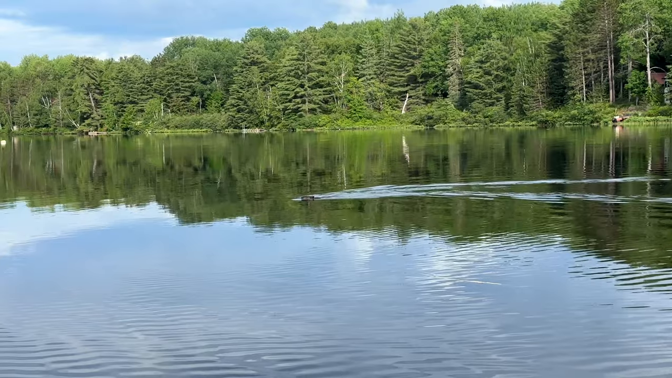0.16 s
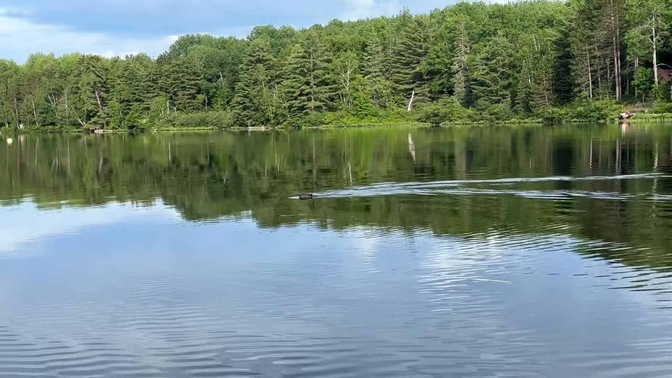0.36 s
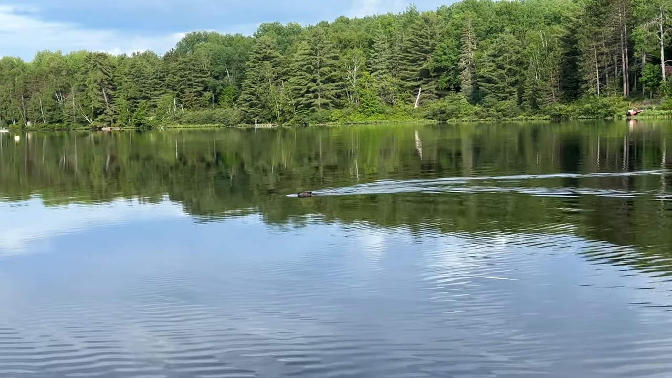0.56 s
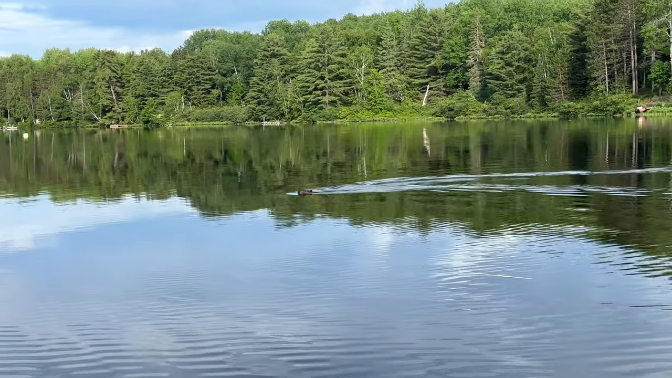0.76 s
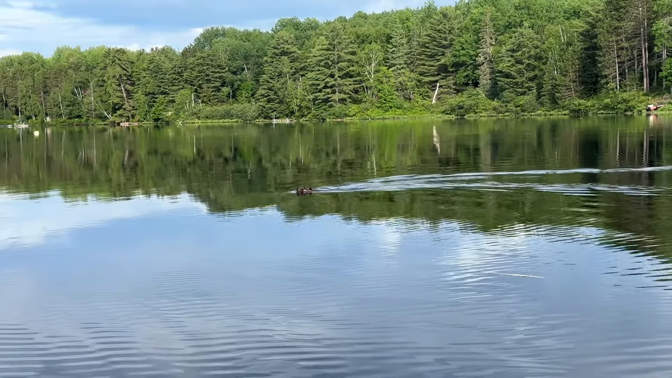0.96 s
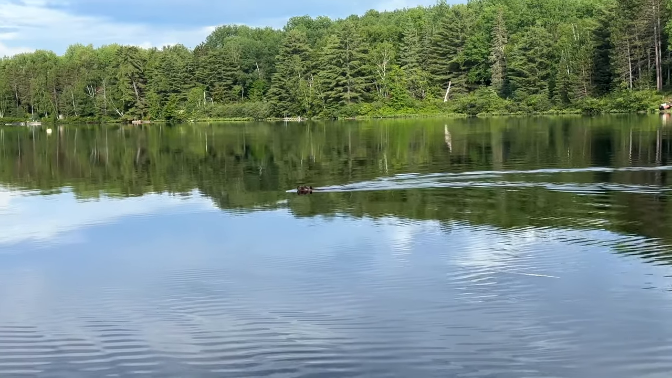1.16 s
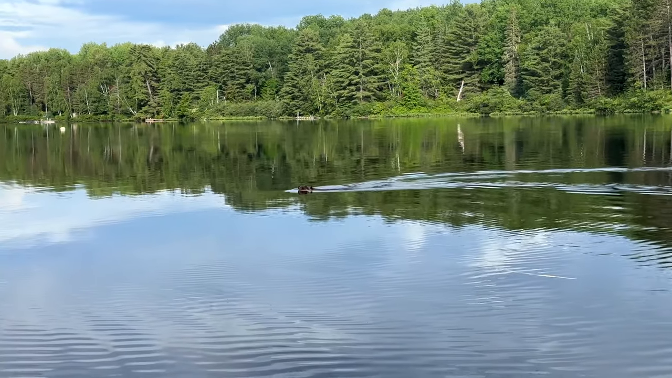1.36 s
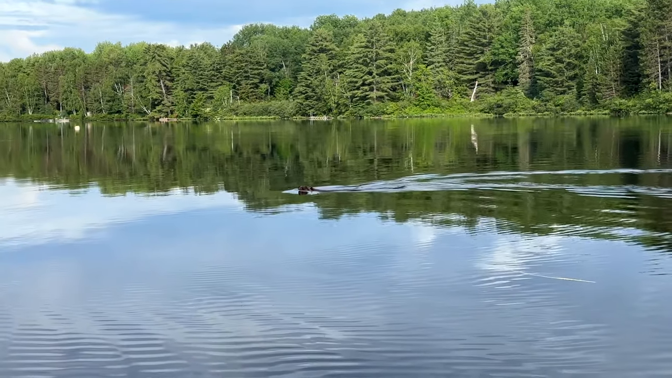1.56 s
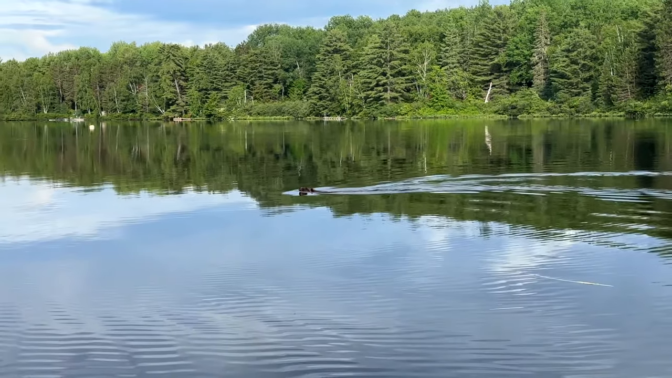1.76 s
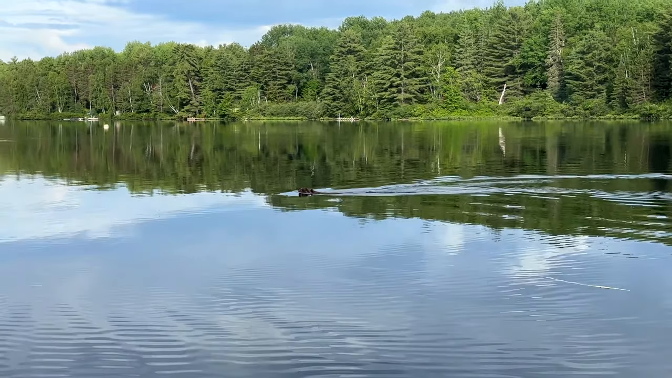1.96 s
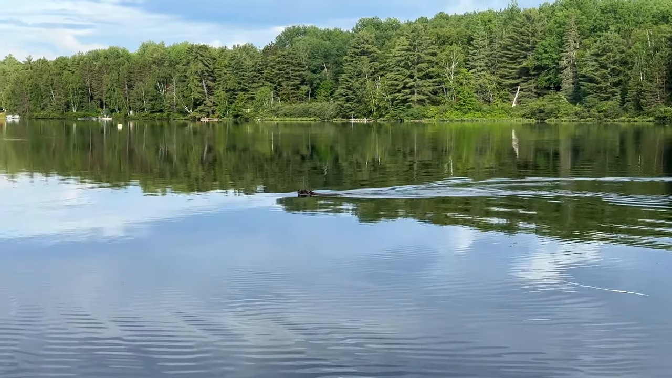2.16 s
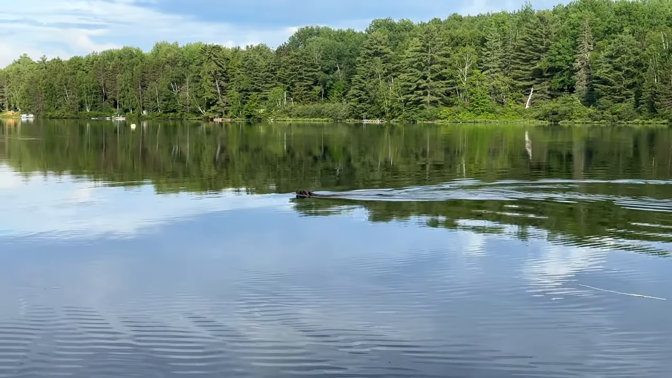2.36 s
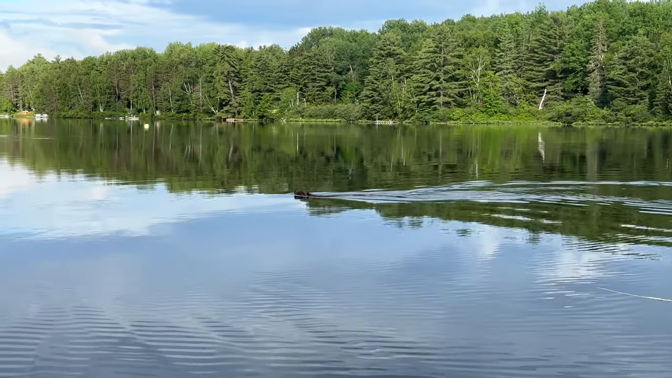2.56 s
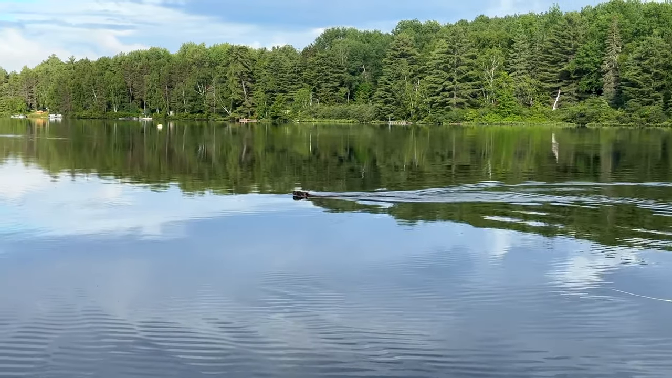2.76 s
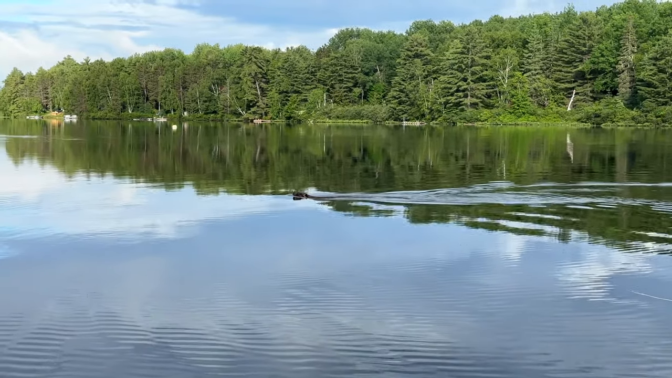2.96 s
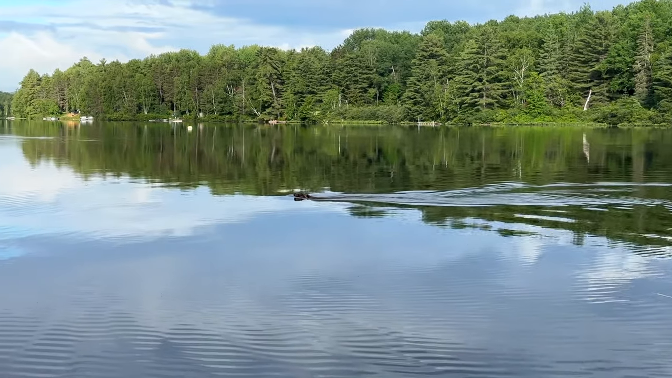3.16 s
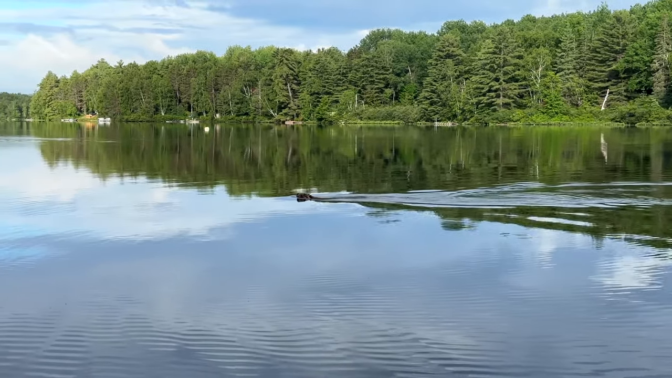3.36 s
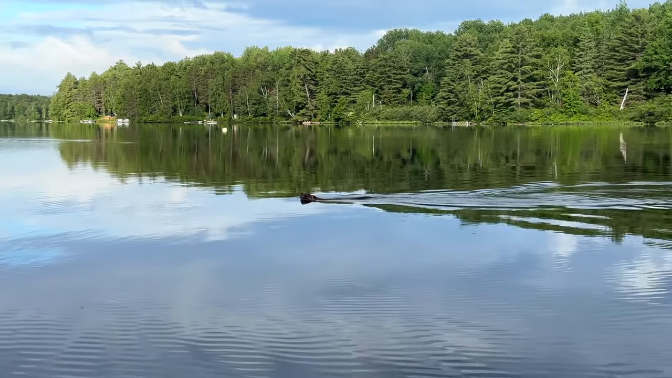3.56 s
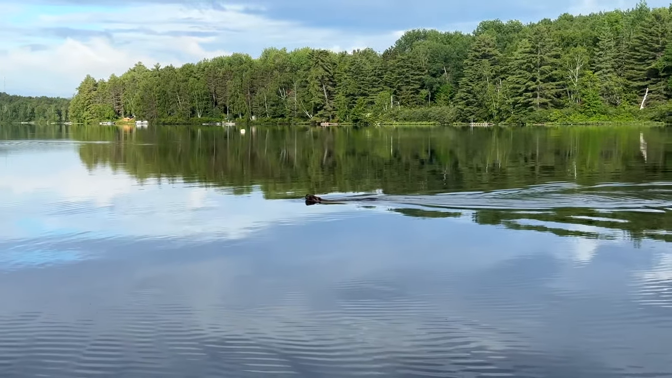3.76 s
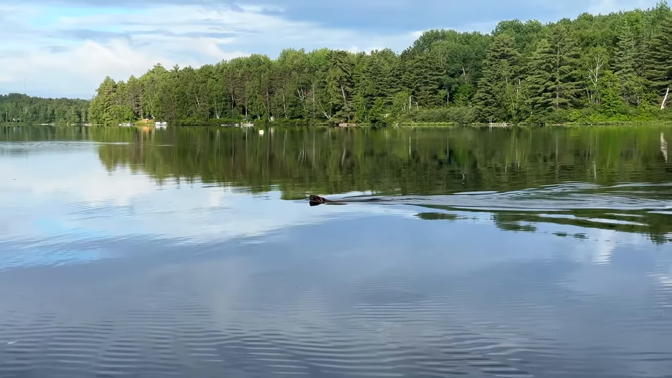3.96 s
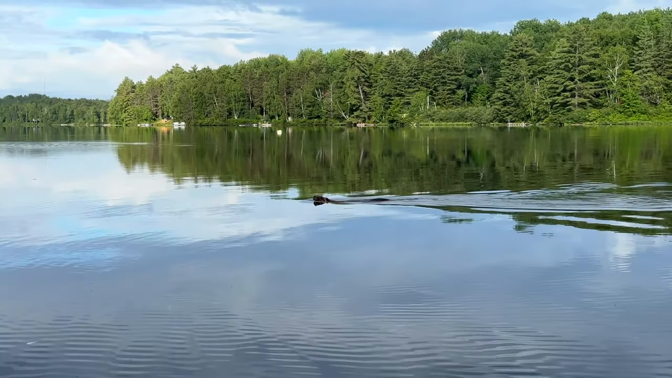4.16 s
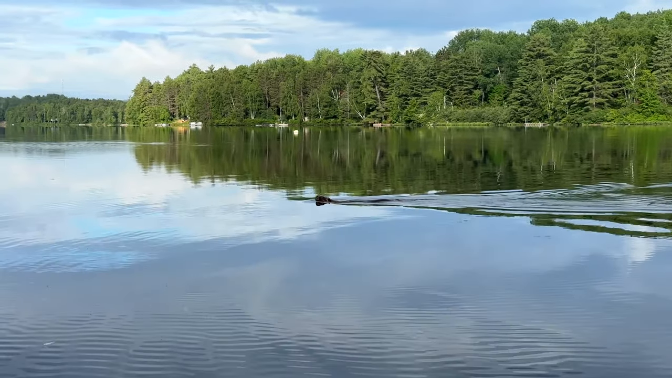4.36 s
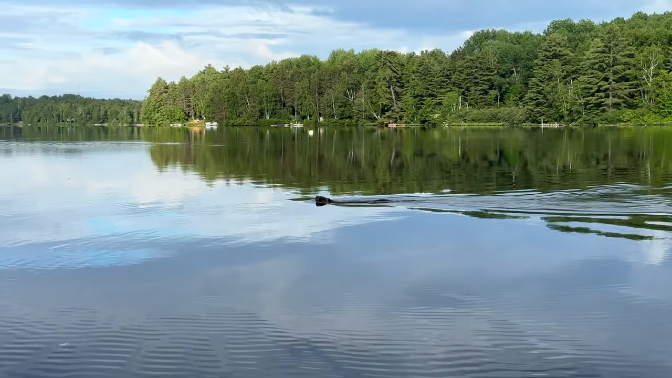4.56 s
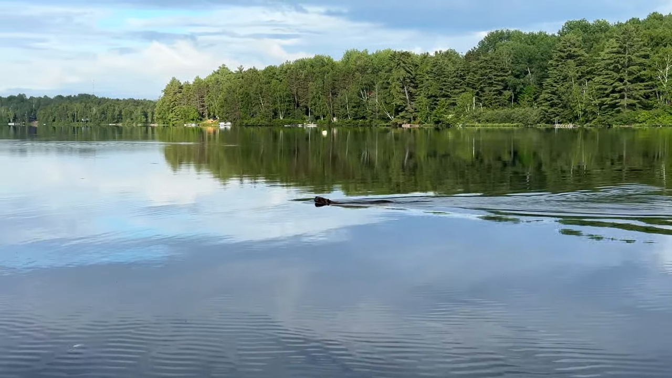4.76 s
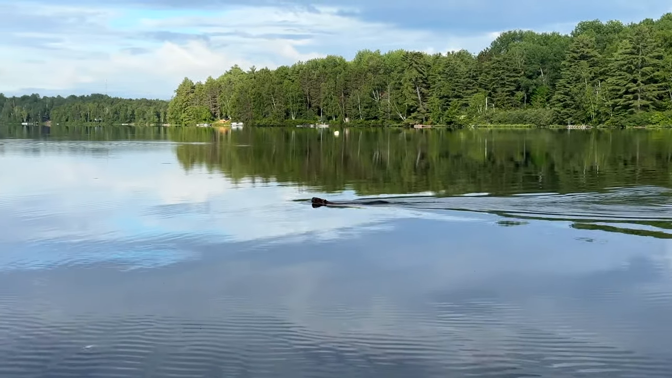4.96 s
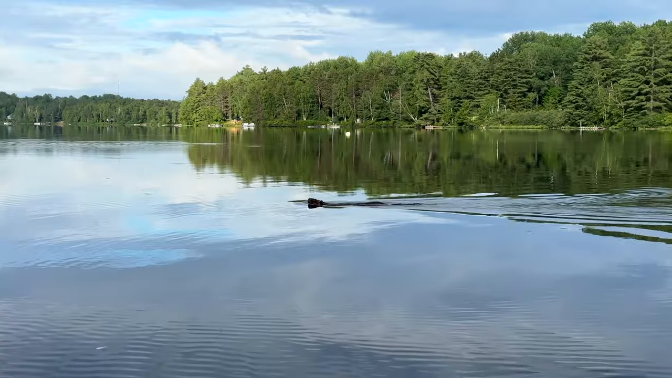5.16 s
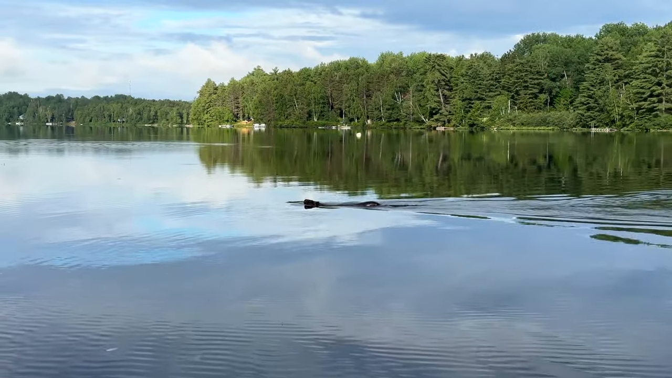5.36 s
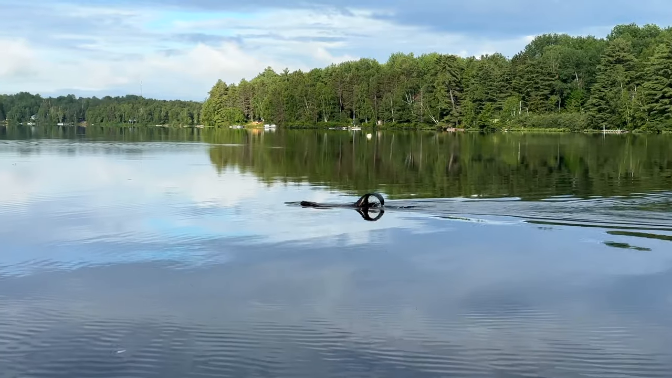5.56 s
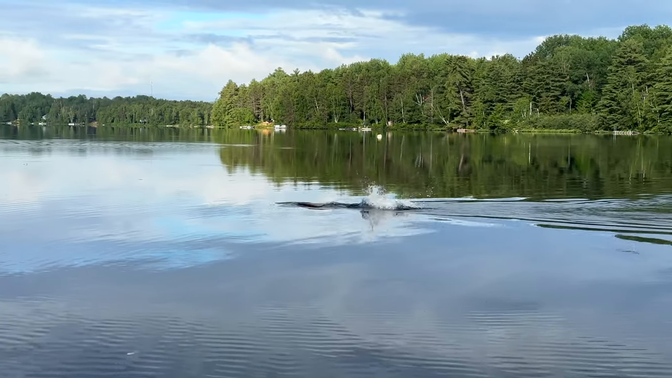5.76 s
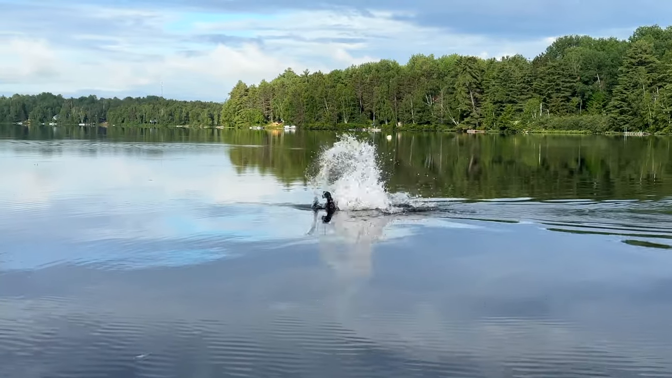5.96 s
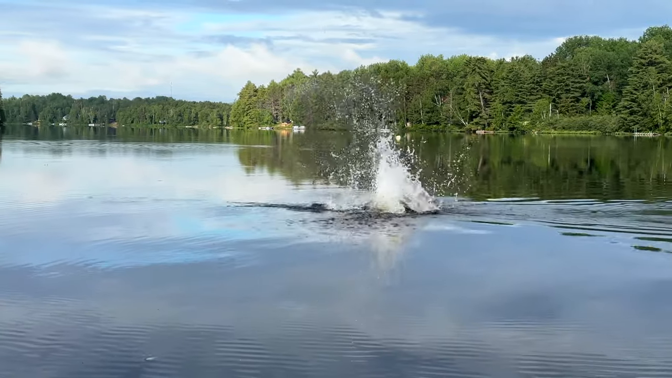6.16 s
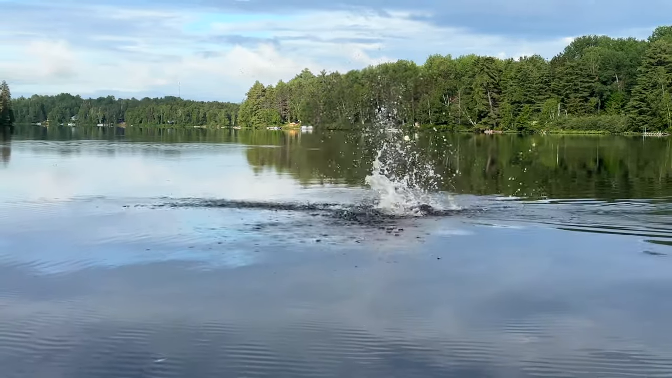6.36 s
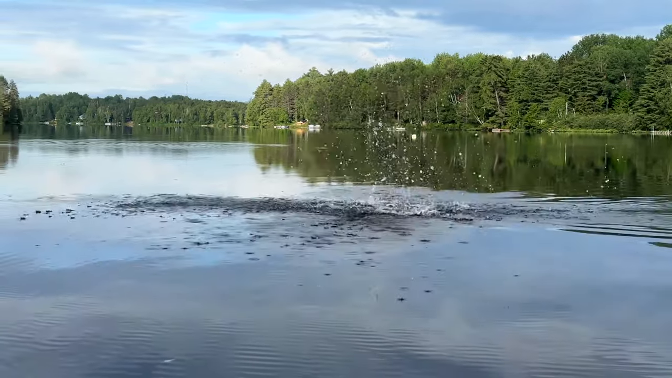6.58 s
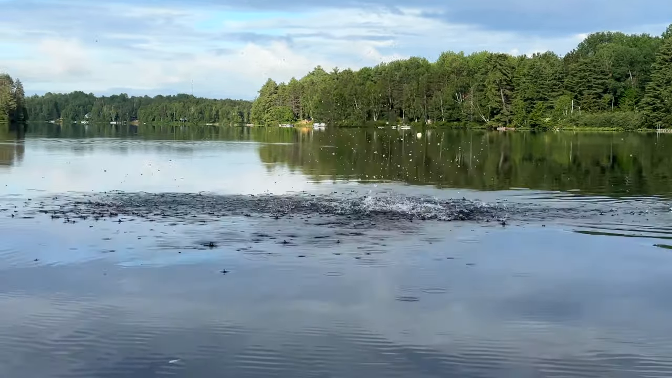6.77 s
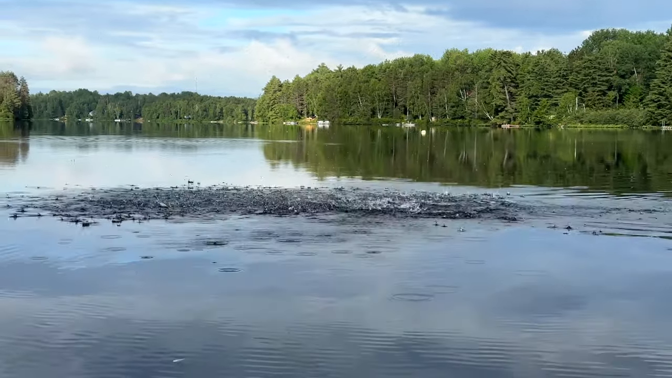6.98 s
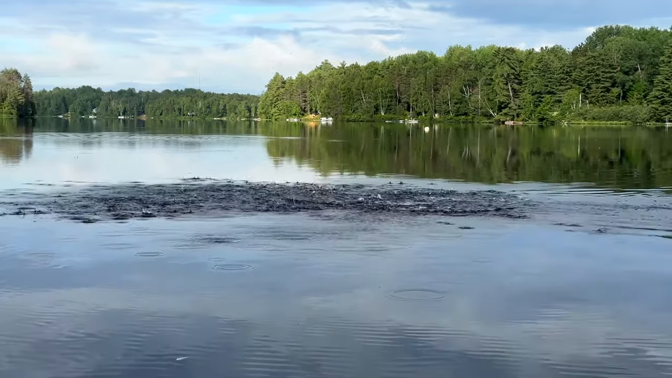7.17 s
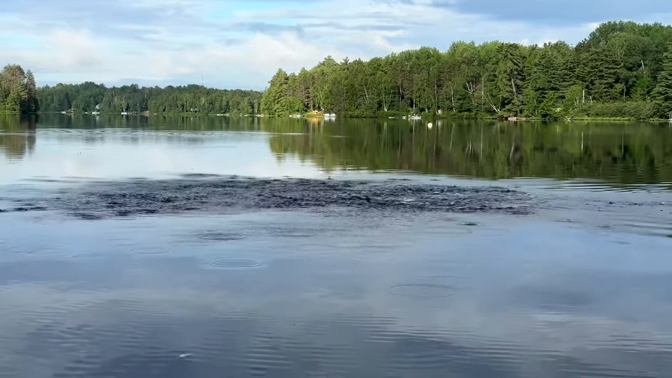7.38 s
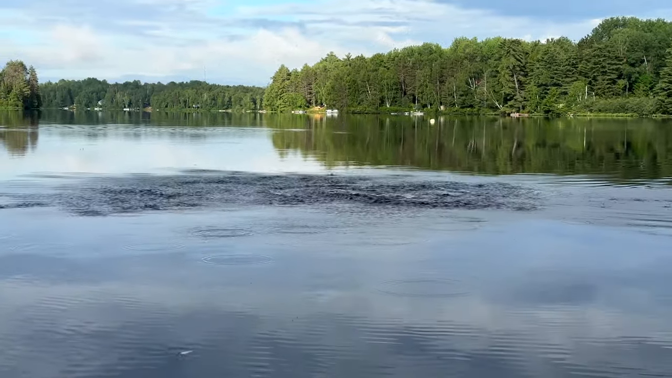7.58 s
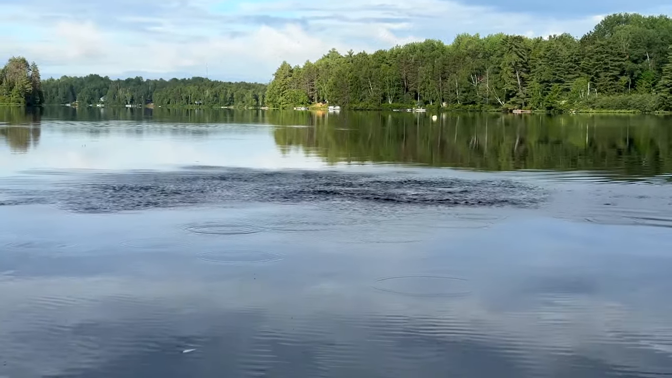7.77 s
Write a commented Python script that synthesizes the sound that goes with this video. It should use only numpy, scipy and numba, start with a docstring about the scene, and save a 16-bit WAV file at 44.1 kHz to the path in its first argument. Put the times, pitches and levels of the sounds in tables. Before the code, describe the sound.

Five quiet seconds of small thin bird whistles, even pips and buzzy trills from a wooded shore over a faint breeze. Brief bubbling as a beaver arches, then one very loud, dry-edged smack of its tail on the lake, a bassy gulp a quarter second later, and a dense splash. Water patters down for about a second and fades; a few faint bird calls remain. Open-air phone pickup with a light echo from the trees.

```python
"""Beaver tail slap on a calm lake

A beaver arches and slaps its tail on the water, heard by the two ports of a phone: shaped noise through
resonances makes the wet crack, a sagging low tone the thump of the collapsing cavity, and ringing tones add
to both. Thousands of damped grains make the gurgle, the spray and the rain of drops that thins out; ringing
tones and short noise taps make single bubbles, drips and rustles. Gliding near-sines sing from the wooded
shore over soft air noise."""
import sys
import numpy as np
from scipy import signal
from scipy.fft import rfft, irfft, next_fast_len
from scipy.io import wavfile
from scipy.ndimage import uniform_filter1d
from numba import njit

SR = 44100
rng = np.random.default_rng(int(sys.argv[2]) if len(sys.argv) > 2 else 0)


def gain_from_decibels(decibels):
    """Convert decibel values to linear amplitude factors."""
    exponent = np.asarray(decibels, float) / 20
    return 10 ** exponent


def to_wav(sig):
    """Store sig (one row per channel, or 1-D mono) as 16-bit WAV at the path in sys.argv[1].

    Samples outside -1..1 are clipped; the rate is SR.
    """
    pcm = np.clip(np.atleast_2d(sig), -1, 1) * 32767
    pcm = np.round(pcm).astype(np.int16)
    wavfile.write(sys.argv[1], SR, pcm.T)  # frames by channels


N = 344846
LONG = next_fast_len(N)

# Start and end in seconds of the time the water moves.
WET_S = 5.38, 7.82
# Colour of spray and thrown drops. Each row: frequency in Hz, relative gain in dB.
SPRAY = [(1500, -2), (2200, -11), (3300, -6), (5000, -7), (6500, -11.5), (7600, -5), (10000, -4),
         (12000, -13), (14800, -4.5), (16000, -18)]
# Dense spray as the back arches, the tail lands and water rains down. Each row: time in seconds, level in dB.
SPRAY_LEVEL = [(5.38, -106), (5.41, -83), (5.48, -75), (5.5, -61.5), (5.535, -61.5), (5.56, -51.5),
               (5.6, -46.5), (5.62, -59), (5.69, -69.5), (5.72, -44), (5.75, -67.5), (5.815, -61),
               (5.835, -45.5), (5.9, -41.5), (6.08, -45), (6.85, -46.5), (6.97, -51), (7.15, -64),
               (7.25, -69), (7.82, -84)]


def level(x, db):
    """Set the rms level."""
    return x * gain_from_decibels(db) / np.sqrt(np.mean(x ** 2))


def curve(rows):
    """Draw a (seconds, value) table as a line, sample by sample."""
    s, value = np.transpose(rows)
    return np.interp(np.arange(N) / SR, s, value)


def colour(x, points):
    """Filter through (Hz, dB) points joined on a log axis, 80 dB down outside them."""
    hz, db = np.transpose(points)
    f = np.fft.rfftfreq(LONG, 1 / SR) + 1
    gain = gain_from_decibels(np.interp(np.log(f), np.log(hz), db, -80, -80))
    return irfft(rfft(x, LONG) * gain, LONG)[..., :N]


def band(x, hz, width):
    """One resonance, gain 1 at the centre."""
    return signal.lfilter(*signal.iirpeak(hz, hz / width, SR), x)


def walk(rate):
    """Random levels held 1 / rate seconds and smoothed twice; spread near 1."""
    k = int(SR / rate)
    held = np.repeat(rng.standard_normal(N // k + 1), k)
    return 1.04 * uniform_filter1d(uniform_filter1d(held, k), k)[:N]


def flutter(x, depth_db, rate, db=0):
    """Let the level wander by about depth_db around db."""
    return x * gain_from_decibels(db + depth_db * walk(rate))


def later(x, s):
    """Shift a stereo sound by s seconds; its end wraps to the front."""
    return np.roll(x, int(s * SR), axis=1)


def add(out, s, sound, pan_db=0):
    """Mix a sound in at s seconds; pan_db is left minus right."""
    i = int(s * SR)
    sound = sound[:N - i]
    out[:, i:i + len(sound)] += sound * gain_from_decibels(np.array([[pan_db], [-pan_db]]) / 2)


def whistle(out, rows, start=0, buzz=0):
    """A near sine along (seconds, Hz, dB) rows with soft ends; buzz chops it into an uneven trill."""
    s, hz, db = np.transpose(rows)
    t = np.arange(s[0], s[-1], 1 / SR)
    trill_rate_hz = 110
    beat = 2 * np.pi * trill_rate_hz * t + .015 * np.cumsum(rng.standard_normal(len(t)))
    pitch = uniform_filter1d(np.interp(t, s, hz), size=300) * (1 + buzz * .07 * np.sin(beat))
    # slight random unsteadiness of pitch
    pitch = pitch * (1 + .12 * uniform_filter1d(rng.standard_normal(len(t)), size=350))
    edge = np.minimum(np.minimum(t - s[0], s[-1] - t) / (.005 + .04 * buzz), 1)
    loudness = np.sqrt(2) * gain_from_decibels(np.interp(t, s, db)) * edge * (1 + buzz * np.cos(beat))
    add(out, start + s[0], loudness * np.sin(2 * np.pi * np.cumsum(pitch) / SR))


def shore(x, t60, db):
    """Scattered echoes from the trees around the water: a decaying noise tail, mostly common to both sides."""
    t = np.arange(int(t60 * SR)) / SR
    tail = rng.standard_normal((2, len(t))) * 1000. ** (-t / t60) * np.minimum(t / 0.013, 1)
    tail = tail[0] + 0.12 * tail
    return signal.fftconvolve(x, tail * gain_from_decibels(db) / np.sqrt(np.sum(tail[0] ** 2)), axes=1)[:, :N]


def crack(out):
    """Water bursts from under the flat tail for about ten milliseconds: noise rings in a set of resonances."""
    # What the crack rings in. Each row: centre in Hz, width in Hz, relative level in dB.
    resonances = [(375, 570, -8), (880, 670, 2.5), (1560, 90, -3.5), (3200, 630, -5), (5286, 180, -8.5),
                  (7800, 1300, -12), (10000, 2300, -10.5), (14700, 2500, -22.5)]
    start_s, rise_s, hold_s, fall_s, crack_db = 5.699, .004, .0065, .0017, -16.5
    t = np.arange(SR // 20) / SR
    push = np.minimum(t / rise_s, 1) ** 2 * np.exp(-np.maximum(t - rise_s - hold_s, 0) / fall_s)
    burst = push * rng.standard_normal(len(t))
    ringing = sum(gain_from_decibels(db) * band(burst, hz, width) / np.sqrt(width) for hz, width, db in resonances)
    add(out, start_s, ringing * gain_from_decibels(crack_db) / ringing[:SR // 80].std())


def thump(out):
    """The cavity left by the tail closes a quarter second later: a brief low tone of sagging pitch."""
    centre_s, spread_s, thump_db, centre_hz = 5.950, 0.0051, -12, 137
    sag = 0.17  # share of the pitch lost per spread_s
    t = np.arange(SR // 20) / SR
    u = (t - t.mean()) / spread_s
    # the pitch sags as the trapped air pocket sinks and widens
    phase = 2 * np.pi * centre_hz * spread_s * (u - sag * u ** 2 / 2)
    add(out, centre_s - t.mean(), gain_from_decibels(thump_db) * np.exp(-np.abs(u) ** 3 / 2) * np.cos(phase))


def slap():
    """The tail hits the water: noise burst of the crack, then low tone of the thump."""
    out = np.zeros((2, N))
    crack(out)
    thump(out)
    return out


@njit
def grains(start, hz, cycles, size, glide, length):
    """Each grain is a small bubble: a damped tone that rises as it dies."""
    out = np.zeros(length)
    for k in range(len(start)):
        ring = int(cycles[k] * SR / hz[k]) + 2
        p = np.exp(2j * np.pi * hz[k] / SR - 6 / ring)
        turn = np.exp(2j * np.pi * hz[k] / SR * glide / ring)
        z = size[k] + 0j
        for i in range(start[k], min(start[k] + ring, length)):
            out[i] += z.imag
            z, p = z * p, p * turn
    return out


def shower(count, lo_hz, hi_hz, cycles, scatter_db, glide, shrink=0):
    """Grains strewn over the splash; a few are much larger, and with shrink the biggest bubbles stop first."""
    when, pitch, ring, chance = rng.random((count, 4)).T
    start = ((WET_S[0] + when * (WET_S[1] - WET_S[0])) * SR).astype(int)
    lo_hz = lo_hz * (1 + shrink * when ** 3)
    hz = lo_hz * (hi_hz / lo_hz) ** pitch
    size = gain_from_decibels(-scatter_db * np.log(1 - chance))
    return grains(start, hz, cycles * (.5 + ring), size, glide, N)


def spread(x, points, share, db):
    """Play grains at both ports, plus a share of unrelated noise that follows them, while the water moves."""
    moving = slice(int(WET_S[0] * SR), int(WET_S[1] * SR))
    x = x / x[moving].std()
    grain_level = uniform_filter1d(np.abs(x), size=200)
    both = colour(x + share * grain_level * rng.standard_normal((2, N)), points)
    out = np.zeros((2, N))
    out[:, moving] = (both * gain_from_decibels(db))[:, moving] / both[:, moving].std()
    return out


def gurgle():
    """Bubbles in the churned water come before the spray and die before it."""
    # Colour of the gurgle. Each row: frequency in Hz, relative gain in dB.
    gurgle_colour = [(50, -16), (150, -21.5), (400, -6.5), (1000, 3.5), (1600, 7), (1900, -7),
                     (2600, -26.5)]
    # Gurgle against spray. Each row: time in seconds, level over the spray in dB.
    gurgle_lead = [(5.47, 23.5), (5.5, 5.5), (5.95, 9.5), (7.4, -16)]
    bubbles = shower(count=5000, lo_hz=110., hi_hz=1900., cycles=8., scatter_db=2.1, glide=.3, shrink=15)
    gurgle_db = curve(SPRAY_LEVEL) + curve(gurgle_lead) + 1.6 * walk(30)
    return spread(bubbles, gurgle_colour, .25, gurgle_db)


def fizz():
    """Fine spray: grains so dense that they fuse into a wash."""
    spray = shower(count=27000, lo_hz=1200., hi_hz=15500., cycles=9., scatter_db=2.4, glide=.1, shrink=8)
    return spread(spray, SPRAY, .3, curve(SPRAY_LEVEL) + 1.8 * walk(60) + 2.3 * walk(18))


def patter():
    """Larger drops: sparse grains that stand out as the rain thins, then stop."""
    # Drops against spray. Each row: time in seconds, level over the spray in dB.
    drops_lead = [(5.5, 1), (5.56, -3.5), (6.08, -12), (6.85, 1.5), (7.25, 4), (7.33, -14)]
    drops = shower(count=1100, lo_hz=1200., hi_hz=15000., cycles=14., scatter_db=1.8, glide=.15, shrink=7)
    return spread(drops, SPRAY, .3, curve(SPRAY_LEVEL) + curve(drops_lead))


def splash():
    """Churned and thrown water: gurgle, fizz and patter."""
    return gurgle() + fizz() + patter()


def ring(out, s, db, hz, t60, glide, pan_db=0):
    """A ringing tone: a decaying sine whose pitch climbs by the share glide within half of t60."""
    t = np.arange(SR // 2) / SR
    phase = 2 * np.pi * np.cumsum(hz * (1 + glide * np.minimum(2 * t / t60, 1))) / SR
    add(out, s, gain_from_decibels(db) * np.minimum(t / .0018, 1) * 1000. ** (-t / t60) * np.sin(phase), pan_db)


def tap(out, s, db, hz, t60):
    """A single pat or rustle: band noise, set to an rms of db and then made to decay."""
    t = np.arange(SR // 2) / SR
    width = min(80 * t60 * hz, 2 * hz, 9000)  # the briefest taps are the most pitched
    hiss = band(band(rng.standard_normal(len(t)), hz, width), hz, width)
    add(out, s, level(hiss, db) * 1000. ** (-t / t60))


def ringing_tones(out):
    """Tones of the slap and of bubbles in the churned water, the softer ones longer; bloops slide up."""
    # Ringing tones: those at 5.709, 5.939 and 5.949 belong to the slap's crack and thump; the others are
    # bubbles in the churned water. Each row: start in seconds, starting level in dB, starting pitch in Hz.
    tones = [(5.412, -50, 990), (5.446, -48.5, 756), (5.494, -30.5, 1170), (5.507, -45, 322),
             (5.543, -26.5, 322), (5.584, -32.5, 863), (5.594, -27, 1240), (5.709, -5.5, 393),
             (5.785, -36.5, 430), (5.844, -27, 1370), (5.854, -24.5, 804), (5.939, -5.5, 365),
             (5.949, -16, 300), (5.979, -13, 308), (6.058, -24, 620), (6.315, -22, 325), (7.096, -53, 1000),
             (7.116, -50, 1146), (7.198, -54, 913), (7.228, -58, 1396), (7.289, -47, 1304)]
    # Hollow bloops as a pocket closes. Each row: start and length in seconds, first and last pitch in Hz,
    # rms level in dB.
    bloops = [(6.778, .04, 480, 1000, -54), (6.87, .03, 580, 1300, -57), (6.99, .05, 580, 950, -64)]
    for s, db, hz in tones:
        t60 = min(0.013 * gain_from_decibels(-0.31 * db), .055)  # 0.31 dB more ring time per dB less level
        ring(out, s, db, hz, t60, glide=.1)
    for s, length, hz, to_hz, db in bloops:
        whistle(out, [(0, hz, db), (length, to_hz, db)], s)


def falling_water(out):
    """Sheets of water fall back flat and the last big drops land: short noise taps."""
    # Flat sheets. Each row: start in seconds, rms level in dB before the decay.
    pats = [(5.496, -47.5), (5.845, -35.5), (5.896, -32), (5.94, -37.5), (6.047, -37.5), (6.348, -37.5),
            (6.508, -37.5), (6.594, -38), (6.823, -35), (6.847, -38), (6.883, -38)]
    # Last big drops. Each row: start in seconds, rms level in dB before the decay, centre in Hz.
    last_drops = [(6.939, -33, 5000), (6.9454, -26.5, 5300), (6.963, -31, 8160), (7.055, -50, 6000),
                  (7.0615, -35.5, 9300), (7.093, -36, 8000), (7.129, -31, 6240), (7.142, -43, 7000),
                  (7.198, -43, 12000), (7.217, -46, 13000), (7.226, -49.5, 12960), (7.265, -48, 12000),
                  (7.282, -43, 12000), (7.306, -42, 12000), (7.324, -44, 12000)]
    for s, db in pats:
        tap(out, s, db, hz=3300, t60=0.024)
    for s, db, hz in last_drops:
        tap(out, s, db, hz, t60=0.0088)


def near_sounds(out):
    """Drips, knocks and rustles close to the phone: ringing tones and noise taps."""
    # Drips and knocks. Each row: start in seconds, starting level in dB, starting pitch in Hz,
    # 60 dB decay in seconds, glide as a share of the pitch, left minus right in dB.
    near_drips = [(.01, -57.5, 2210, 0.027, 0.3, 6), (0.057, -50.5, 1880, 0.029, 0, 6),
                  (0.088, -53, 1960, 0.033, .3, 8), (0.608, -45, 326, 0.043, 0.037, 7),
                  (0.721, -46.5, 1730, 0.045, 0.044, 4), (1.688, -49, 3200, 0.02, 0.14, -2),
                  (4.246, -49.5, 175, 0.038, 0.11, 4), (4.597, -44.5, 1700, 0.039, 0.46, -19.5),
                  (4.716, -50, 1560, 0.025, 0.1, -13), (4.72, -49, 128, 0.1, 0, 5),
                  (5.200, -49.5, 1534, 0.082, 0.039, -30), (7.535, -57.5, 2220, .04, 0.12, 4.5)]
    # Rustles. Each row: start in seconds, rms level in dB before the decay, centre in Hz, 60 dB decay in seconds.
    rustles = [(0.377, -53.5, 5340, 0.055), (0.554, -60.5, 2880, 0.21), (.604, -56.5, 3050, 0.29),
               (0.609, -60, 596, 0.97), (0.723, -57, 4170, 0.038), (1.489, -68, 1100, 0.26),
               (1.688, -67, 5000, 0.021)]
    for row in near_drips:
        ring(out, *row)
    for row in rustles:
        tap(out, *row)


def tones_and_taps():
    """All ringing tones, falling water and near sounds together."""
    out = np.zeros((2, N))
    ringing_tones(out)
    falling_water(out)
    near_sounds(out)
    return out


def warbler():
    """The near warbler sings four gliding phrases, heard straight, off the water and off the bank."""
    # One phrase, a list of rows a note. Each row: seconds into the phrase, pitch in Hz, relative level in dB.
    phrase = [
        [(0, 2910, -9.5), (.028, 4410, 0), (.058, 2880, -6)],
        [(.104, 4404, -4.5), (.135, 5060, -1.5)],
        [(.17, 5090, -3.5), (.203, 5745, 2), (.225, 5140, -3), (.263, 3846, -3.5), (.3, 4145, -4.5)],
        [(.355, 5600, -2.5), (.405, 4210, -3)],
        [(.402, 5190, -2), (.418, 5365, -1), (.465, 3453, -2.5), (.495, 2900, -12.5)],
    ]
    # Swell of the song. Each row: time in seconds, level in dB.
    swell = [(3.6, -100), (3.7, -83), (4.0, -71.5), (4.4, -63), (5.5, -62)]
    first_s, every_s = 3.321, .5543
    song = np.zeros((2, N))
    for k in range(4):
        for note in phrase:
            vary = rng.standard_normal(2)  # no two notes come out alike
            varied = np.multiply(note, [1, 1 + .012 * vary[0], 1]) + [0, 0, 2 * vary[1]]
            whistle(song, varied, first_s + k * every_s)
    song = song * gain_from_decibels(curve(swell))
    off_water = flutter(later(song, 0.011), 5.2, 90)
    off_bank = flutter(later(song, 0.023), 5, 90, db=-11)
    return flutter(song, 2.7, 90) + off_water + off_bank


def even_pips(song, far):
    """A far bird's even pips, each a little flatter and trailed by a faint second blip."""
    # Each row: start in seconds, level in dB.
    pips = [(0.208, -69.5), (0.341, -70.5), (0.47, -68.5), (.6, -65.5), (0.729, -64), (0.861, -68),
            (0.996, -66.5)]
    first_hz, sag_hz_per_s, pip_s = 2960, 68.7, 0.047
    for s, db in pips:
        hz = first_hz - sag_hz_per_s * s
        whistle(song, [(-.008, hz, db - 15), (.008, hz, db + 1), (pip_s, hz, db)], s)
        whistle(far, [(0, hz, db - 21), (.025, hz, db - 22)], s + pip_s + 0.013)


def climbing_warbler(far, buzz):
    """A second warbler whistles up, drops and ends in a buzzing trill."""
    # Whistle, then trill. Each row: seconds from the top, share of the top pitch, relative level in dB.
    climb = [(-.12, .71, -6.5), (-.05, .85, 0.5), (0, 0.97, -3.5), (.022, .96, 0.5), (.055, .71, -2.5)]
    climb_trill = [(.07, .64, -12), (.14, .74, -5), (.21, .82, -1), (.34, .83, -1), (.43, .84, -12)]
    # Each row: time of the top in seconds, top pitch in Hz, whistle level in dB, trill level in dB.
    calls = [(1.39, 4890, -81, -81), (3.186, 4890, -79.5, -80.5), (5.165, 4580, -75.5, -77),
             (7.5, 5030, -72, -72.5)]
    for s, top_hz, db, trill_db in calls:
        whistle(far, np.multiply(climb, [1, top_hz, 1]) + [0, 0, db], s)
        whistle(buzz, np.multiply(climb_trill, [1, top_hz, 1]) + [0, 0, trill_db], s, buzz=0.94)


def thin_singer():
    """A thin high singer repeats a figure of falling notes; a fluttering copy follows 9 ms later."""
    # The figure, a list of rows a note. Each row: seconds into the figure, pitch in Hz, relative level in dB.
    seeps = [
        [(0, 7100, 3), (.03, 6700, -4.5), (.065, 6550, -16)],
        [(.09, 7100, -1), (.115, 6300, -7)],
        [(.125, 7000, -6), (.15, 5900, -11), (.18, 5650, -10)],
    ]
    # Each row: start of the figure in seconds, level in dB.
    repeats = [(.18, -84), (.45, -77.5), (0.729, -75), (.99, -75)]
    high = np.zeros((2, N))
    for s, db in repeats:
        for note in seeps:
            whistle(high, np.add(note, [0, 0, db]), s)
    return flutter(high, 6, 110) + flutter(later(high, .009), 6, 110, db=-3)


def shore_calls(far):
    """Single sliding whistles and short up-and-down chirps from the shore."""
    # Slides. Each row: start and length in seconds, first and last pitch in Hz, starting level in dB.
    slides = [(1.641, 0.12, 2310, 2260, -81), (1.725, .04, 3130, 2210, -83), (1.83, 0.036, 2850, 2970, -83),
              (2.1, 0.064, 3200, 3080, -78), (2.16, 0.18, 3090, 3200, -82), (2.15, .055, 5800, 5950, -83),
              (2.225, 0.042, 3200, 4000, -76.5), (2.25, .12, 5870, 5460, -81.5),
              (2.551, .03, 3300, 2720, -91), (2.763, 0.025, 3120, 2400, -84),
              (2.85, 0.033, 3200, 2500, -85), (2.951, 0.072, 3250, 2750, -86.5),
              (3.026, 0.035, 3330, 2620, -82), (3.81, .07, 3750, 3380, -83),
              (4.023, 0.034, 3300, 2560, -74), (4.27, .11, 2950, 2650, -82.5),
              (5.18, .025, 5900, 6700, -77.5), (5.052, 0.05, 3000, 2730, -77),
              (5.11, 0.037, 2560, 2190, -78), (7.706, 0.13, 3265, 3114, -64)]
    # Chirps. Each row: start and length in seconds, foot and top pitch in Hz, level in dB.
    hooks = [(1.9, 0.064, 2700, 3660, -84.5), (2.693, .06, 2800, 3400, -87), (4.069, .09, 2570, 3270, -80)]
    for s, length, hz, to_hz, db in slides:
        half_hz = hz + .72 * (to_hz - hz)  # most of the slide is done by half time
        whistle(far, [(0, hz, db), (length / 2, half_hz, db), (length, to_hz, db - 2)], s)
    for s, length, hz, top_hz, db in hooks:
        whistle(far, [(0, hz, db), (0.36 * length, top_hz, db), (length, hz, db)], s)


def deep_wood(far):
    """A faint random scatter of short bent chirps from deeper in the wood."""
    for when, height, bend in rng.random((140, 3)):
        s, hz = 7.7 * when, 2500 + 3500 * height ** 2
        whistle(far, [(s, hz, -99), (s + .05, hz * (.75 + .4 * bend), -99)])


def buzzy_trills(buzz):
    """Trills on one pitch, chopped by a fast uneven beat."""
    # Each row: start and length in seconds, pitch in Hz, level in dB.
    trills = [(0, 1.11, 6700, -93), (1.128, .13, 3730, -83.5)]
    for s, length, hz, db in trills:
        whistle(buzz, [(0, hz, db), (length, hz, db)], s, buzz=.97)


def birds():
    """All singers on the wooded shore; far calls are mostly echo, and moving air makes them flutter."""
    far, buzz = np.zeros((2, 2, N))
    song, high = warbler(), thin_singer()
    even_pips(song, far)
    climbing_warbler(far, buzz)
    shore_calls(far)
    deep_wood(far)
    buzzy_trills(buzz)
    far, buzz = flutter(far, 4.5, 70), flutter(buzz, 5.0, 70)
    straight = song + far + high + gain_from_decibels(-3.5) * buzz
    echo = shore(song + high + gain_from_decibels(8.5) * far + gain_from_decibels(9) * buzz, t60=.6, db=-13)
    return straight + flutter(echo, 3, 80)


def air():
    """Half-octave bands of outdoor noise that flicker separately; the breeze moves the middle."""
    # Colour of the air. Each row: frequency in Hz, relative gain in dB.
    air_colour = [(24, -31), (40, -1.5), (121, -6), (615, -13), (1410, -19.5), (1810, -19), (3060, -33),
                  (3470, -36), (8550, -40), (11000, -46), (13800, -41.5), (16000, -62)]
    # Breeze in the trees. Each row: time in seconds, level change around 1.6 kHz in dB.
    breeze = [(0, 2.5), (.5, 1), (1.3, 0.5), (1.5, 3.5), (2.0, -0.5), (2.3, 4), (2.7, 2.5), (2.85, -5),
              (7.3, -3), (7.45, 1.5), (7.6, -3.5)]
    out, breeze_db = 0, curve(breeze)
    for hz in 30 * 2 ** np.arange(0, 9.2, .5):
        lift = np.exp(-np.log2(hz / 1600) ** 2 / 1.3)
        # noise unshared by the two sides, most of it in the middle
        apart = 0.72 + 2.0 * np.exp(-np.log2(hz / 1200) ** 2 / 1.4)
        noise = rng.standard_normal(N) + apart * rng.standard_normal((2, N))
        bump = [(hz / 1.45, -30), (hz / 1.15, 0), (hz * 1.15, 0), (hz * 1.45, -30)]
        flicker_db = lift * breeze_db + 1.94 * walk(8)
        out = out + colour(noise, bump) / np.sqrt(1 + apart ** 2) * gain_from_decibels(flicker_db)
    return level(colour(out, air_colour), db=-66)


def scene():
    """Water, birds and air; slap, ringing tones and noise taps come back faintly from the shore."""
    blows = slap() + tones_and_taps()
    return blows + shore(blows, t60=0.48, db=-23.0) + splash() + birds() + air()


def low_pass(x):
    """Removes everything above the highest recorded frequency."""
    return signal.sosfilt(signal.butter(12, 16820, fs=SR, output="sos"), x)


def record(dry):
    """The two ports hear each pitch with their own phase and level; deep bass and top are cut, peaks rounded."""
    # Phase between the ports. Each row: frequency in Hz, lead of the left in radians.
    port_lead = [(0, .1), (1200, -.3), (1550, -1.8), (2070, -5.5), (3500, -5.7), (4000, -6.2), (6600, -6.3),
                 (8400, 0), (8700, 0), (10600, -np.pi), (12200, -np.pi), (13800, -6.3), (16400, -6.3)]
    # Level between the ports. Each row: frequency in Hz, left minus right in dB.
    port_tilt = [(60, 0.5), (700, 2), (1100, 2.5), (1550, 4.5), (1750, 3), (2050, -4), (2500, 1),
                 (16000, -.5)]
    f = np.fft.rfftfreq(LONG, 1 / SR)
    lead = np.interp(f, *np.transpose(port_lead)) / 2
    hz, db = np.transpose(port_tilt)
    tilt_db = np.interp(np.log(f + 1), np.log(hz), db) / 2
    ports = gain_from_decibels(np.array([tilt_db, -tilt_db])) * np.exp(1j * np.array([lead, -lead]))
    heard = irfft(rfft(dry, LONG) * ports, LONG)[:, :N]
    heard = signal.sosfilt(signal.butter(4, 42, "high", fs=SR, output="sos"), heard)
    rounded = np.tanh(1.5 * heard) / 1.5
    mix = signal.sosfilt(signal.ellip(8, .2, 60, 15900, fs=SR, output="sos"), rounded)
    return low_pass(mix)


dry = scene()
out = record(dry)
to_wav(out)
```